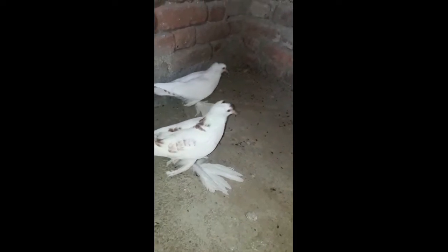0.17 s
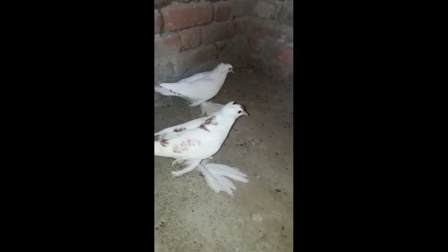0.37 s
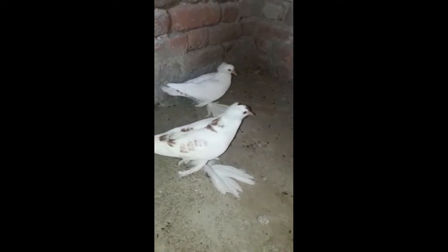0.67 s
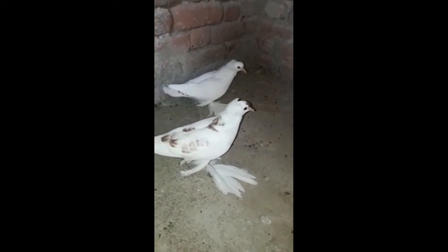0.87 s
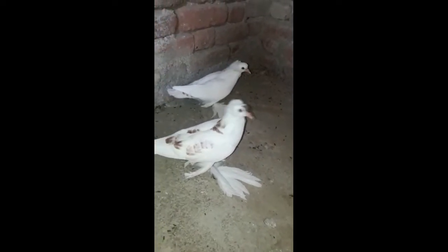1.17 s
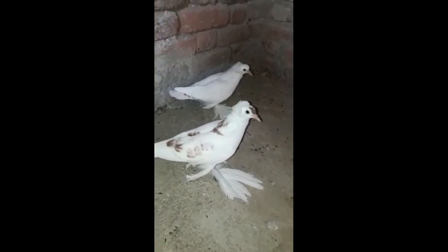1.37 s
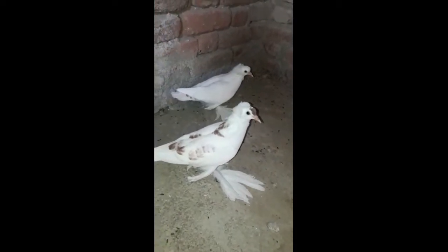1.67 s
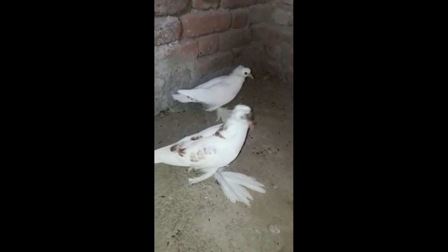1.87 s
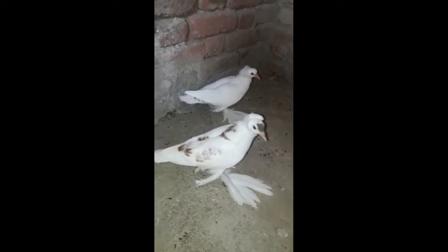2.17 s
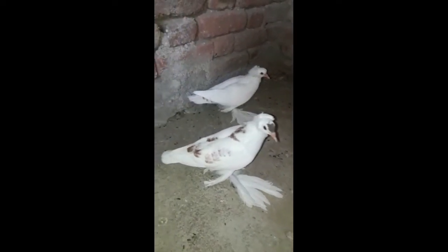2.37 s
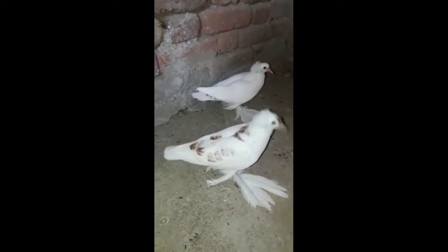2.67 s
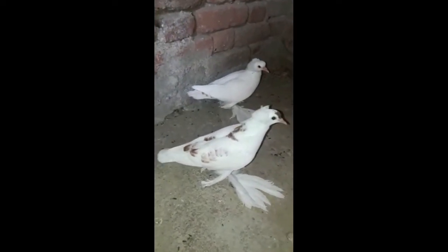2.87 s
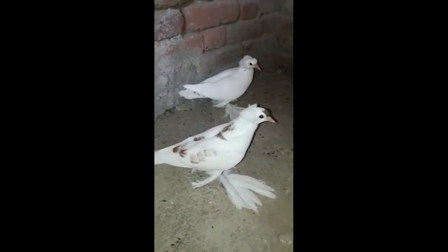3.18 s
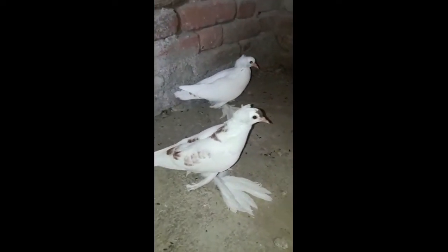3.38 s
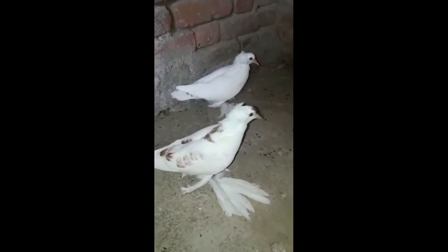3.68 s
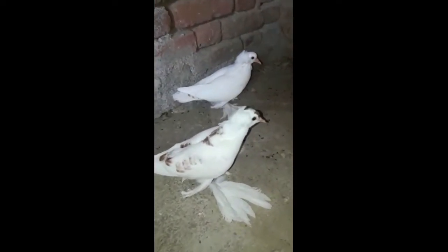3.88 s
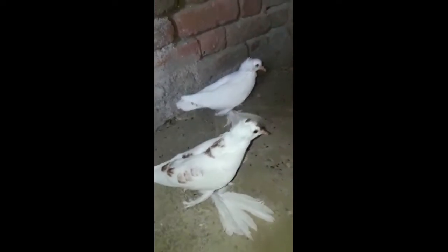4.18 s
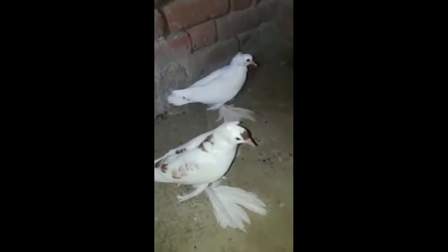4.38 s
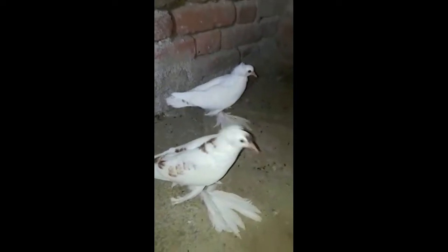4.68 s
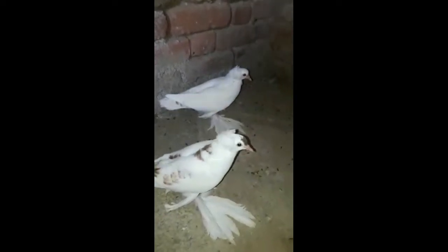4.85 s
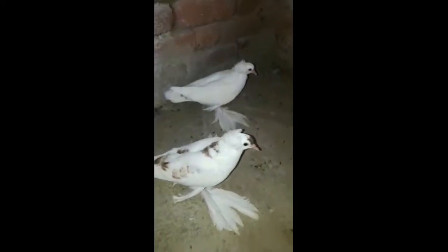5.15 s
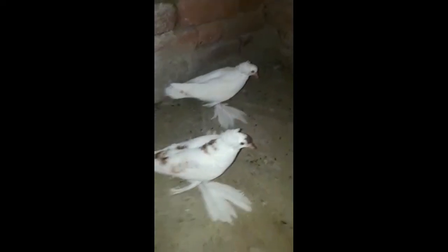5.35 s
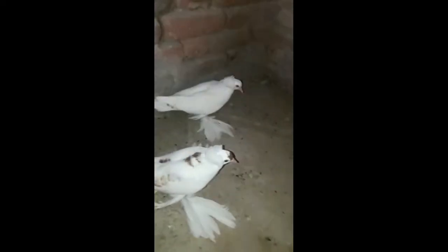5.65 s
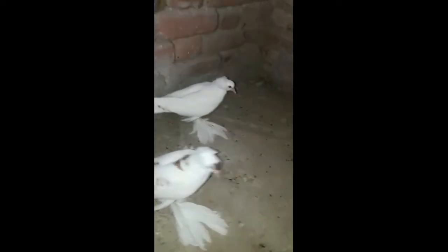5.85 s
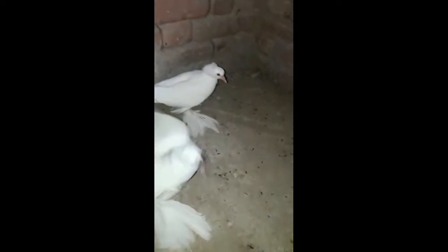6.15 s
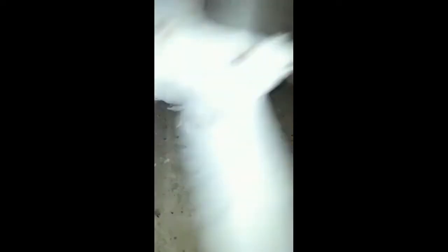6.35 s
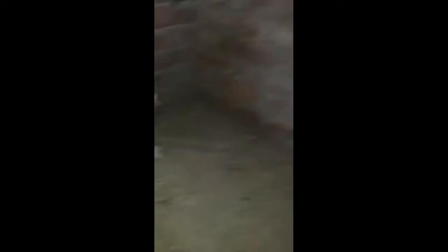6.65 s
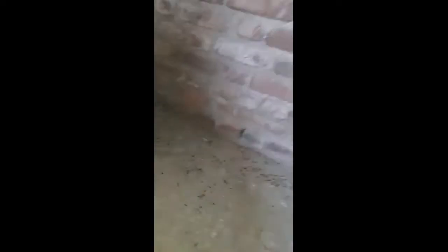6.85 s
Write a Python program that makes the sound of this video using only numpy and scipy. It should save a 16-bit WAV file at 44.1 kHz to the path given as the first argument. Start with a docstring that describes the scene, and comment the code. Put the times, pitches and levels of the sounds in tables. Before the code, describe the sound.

Two pigeons shuffle softly on a gritty floor close to the microphone, a few clicks snap, then one bursts into fluttering, whistling flight.

```python
"""Two pigeons stand on the gritty floor of a small brick room, close to a hand-held phone.
At first feet scuff (dull noise with a ring and gritty hiss) and soft wavering tones murmur and squeak,
over air, rumble and hum made of filtered noise; the hand bumps the phone, and sharp crackles click.
Then the near bird takes off: its wings unfold with a noise burst and clap with a ringing crackle. Beats
swish as noise bursts, a feather whistles a harmonic tone, and gusts push low waves onto the microphone."""
import sys
import numpy as np
from scipy import signal
from scipy.io import wavfile

SR = 44100
rng = np.random.default_rng(int(sys.argv[2]) if len(sys.argv) > 2 else 0)


def generate_wav(sig):
    """Save sig (samples, or channels by samples) to the path in sys.argv[1] as 16-bit PCM at SR."""
    pcm = np.round(np.clip(np.atleast_2d(sig).T, -1, 1) * 32767).astype(np.int16)
    wavfile.write(sys.argv[1], SR, pcm)


N = 309582  # length in samples, about 7 seconds
T = np.arange(N) / SR  # time of each sample in seconds

# The bright hiss of grit underfoot and of feathers. Each row: frequency in Hz, relative level in dB.
HISS_SPECTRUM = [(300, -42), (1500, 0.5), (2800, -4), (4200, 1), (6500, 1), (16000, -4)]
# Downstrokes of the wings. Each row: start in seconds, body level in dB, feather hiss level in dB,
# fall time in seconds.
DOWNSTROKES = [(6.24, -28, -32.5, 0.049), (6.325, -20, -31.5, 0.023), (6.465, -31.5, -37, 0.022),
               (6.593, -37, -38.5, .022), (6.718, -38, -46, 0.0085), (6.839, -32, -52, 0.019),
               (6.954, -31.5, -44, 0.031)]


def amp(db):
    """Turns decibels into gain."""
    return 10 ** (np.asarray(db) / 20)


def evened(x):
    """Scales a sound to an average (rms) level of 1."""
    return x / np.sqrt(np.mean(x ** 2) + 1e-20)


def read(points, hz):
    """Reads a table of values between its frequencies, spaced as pitch is heard (logarithmically)."""
    f, value = np.transpose(points)
    return np.interp(np.log(hz + 1), np.log(f + 1), value)


def level(curve):
    """Turns a curve of seconds and dB into gain over time."""
    return amp(np.interp(T, *np.transpose(curve)))


def add(mix, s, sound):
    """Mixes a sound in at a time in seconds."""
    part = mix[round(s * SR):][:len(sound)]
    part += sound[:len(part)]


def colour(x, spectrum, size=4096):
    """Filters a sound to the given spectrum, with no sound ahead of its cause (minimum phase)."""
    log_gain = np.log(amp(read(spectrum, abs(np.fft.fftfreq(size, 1 / SR)))))
    response = np.exp(np.conj(signal.hilbert(log_gain)))
    taps = np.fft.ifft(response).real
    return signal.oaconvolve(x, taps[:size // 2])[:len(x)]


def drift(per_s):
    """Wanders at random with unit size, through a number of new values per second."""
    knots = np.arange(N) * per_s / SR
    return evened(np.interp(knots, np.arange(N), rng.standard_normal(N)))


def noise(spectrum, grain_db=0, per_s=700):
    """Makes coloured noise of unit level that comes in clumps."""
    clumps = amp(grain_db * drift(per_s))
    return evened(colour(rng.standard_normal(N) * clumps, spectrum))


def resonate(x, hz, width):
    """Rings at one frequency, with a gain of 1 at its centre and a width in Hz."""
    sharpness = max(hz / width, .4)
    return signal.lfilter(*signal.iirpeak(min(hz, SR / 3), sharpness, SR), x)


def stroke(s, rise, fall):
    """Shapes the level of a contact: it builds up, then dies away."""
    build_up = np.clip((T - s) / rise, 0, 1)
    return build_up * np.exp(-np.clip((T - s - rise) / fall, 0, 20))


def swells(s, db, half):
    """Shapes the level of short, rounded sounds (bell curves)."""
    return sum(amp(d) * np.exp(-np.minimum(((T - at) / h) ** 2, 20)) for at, d, h in zip(s, db, half))


def crack(fall, spike=14, crisp_s=0.00062, size=2048):
    """Makes a dying crackle; the shorter the contact, the stronger its clean pressure spike."""
    burst = rng.standard_normal(size) * np.exp(-T[:size] / fall)
    burst[0] += spike * np.exp(-fall / crisp_s)
    return burst


def sized(hit, db, fall):
    """Gives a hit the energy of that level held for its fall time."""
    return amp(db) * hit * np.sqrt(fall * SR) / np.linalg.norm(hit)


def room(x):
    """Reflects sound from brick walls: sparse random echoes blur together, the upper tones dying faster."""
    # Each row: frequency in Hz, time in seconds to die away by 60 dB.
    decay_times = [(100, 0.9), (1000, 0.28), (4000, 0.21), (14000, 0.25)]
    taps = rng.choice([-1., 1.], SR // 2) * (rng.random(SR // 2) < .15)
    taps[:round(.004 * SR)] = 0  # the first echoes need 4 ms to arrive
    hz, t, z = signal.stft(taps, SR, nperseg=256)
    fading = amp(-60 * t / read(decay_times, hz)[:, None])
    tail = signal.istft(z * fading, SR, nperseg=256)[1]
    return signal.oaconvolve(x, tail / np.linalg.norm(tail))[:N]


def room_air():
    """The air of the room is a faint, slightly uneven noise."""
    # Each row: frequency in Hz, relative level in dB.
    air_spectrum = [(30, -21), (80, -3.5), (150, -2.5), (300, -1.5), (480, -2), (700, -8), (1100, -10),
                    (1800, -15), (3000, -21.5), (7000, -25.5), (16000, -24)]
    return amp(-57) * noise(air_spectrum, grain_db=2.5, per_s=23)


def rumble():
    """An uneven low noise rumbles, and settles when the hand holds still."""
    # Level over time. Each row: time in seconds, level in dB.
    rumble_levels = [(0, -64), (1, -61.5), (1.7, -71), (1.9, -55.5), (3.2, -57.5), (3.45, -70), (4.6, -69),
                     (6.2, -78)]
    # Each row: frequency in Hz, relative level in dB.
    rumble_spectrum = [(15, -12), (40, -10.5), (80, -4.5), (130, -7.5), (300, -15.5), (1000, -62)]
    return level(rumble_levels) * noise(rumble_spectrum, grain_db=0.5, per_s=13)


def hum(hum_hz=148, width_hz=42):
    """Noise passes twice through one narrow resonance, which leaves a wavering low hum."""
    # Level over time. Each row: time in seconds, level in dB.
    hum_levels = [(0, -61.5), (4.2, -63.5), (4.6, -54.5), (5, -62.5), (5.35, -57.5), (6.2, -68.5)]
    once = resonate(rng.standard_normal(N), hum_hz, width_hz)
    return level(hum_levels) * evened(resonate(once, hum_hz, width_hz))


def shuffling(rustle_db=-69):
    """Soft shuffles of noise swell and fade over a faint steady rustle."""
    # Each row: middle in seconds, level in dB, half length in seconds.
    shuffle_swells = [(2.845, -62, 0.26), (3.908, -57.5, 0.13), (4.24, -58.5, 0.073), (4.498, -55, 0.091),
                      (4.888, -67, 0.21), (5.34, -57.5, 0.077), (5.606, -51, 0.15), (6, -62.5, 0.27)]
    # Each row: frequency in Hz, relative level in dB.
    shuffle_spectrum = [(100, 1), (400, 8), (1100, 5), (1700, 8.5), (2700, 1), (4500, 1), (7000, 1),
                        (16000, -7.5)]
    loudness = amp(rustle_db) + swells(*np.transpose(shuffle_swells))
    return loudness * noise(shuffle_spectrum, grain_db=2.0, per_s=46)


def thumps(rows, rough):
    """Low pushes act on the microphone: a few cycles each, roughened by turbulent noise."""
    churn = noise([(30, -3), (300, -10.5), (700, -28), (3000, -43)])
    out = np.zeros(N)
    for s, db, hz, half in rows:
        t = T[:round(6 * half * SR)] - 3 * half  # time around the middle of the push
        turbulence = rough * np.roll(churn, -round(s * SR))[:len(t)]
        wave = turbulence - np.cos(2 * np.pi * hz * t)
        push = amp(db) * wave * np.exp(-(t / half) ** 2)
        out += np.interp(T, s + t, push, 0, 0)
    return out


def hand_bumps():
    """The hand bumps the phone, which pushes the microphone directly."""
    # Each row: middle in seconds, level in dB, frequency in Hz, half length in seconds.
    bump_rows = [(.018, -34, 109, .007), (.47, -41, 151, .011), (1.286, -41, 100, .009),
                 (1.385, -51, 115, .015), (1.65, -45, 176, .011), (1.85, -45, 80, .015),
                 (1.94, -44, 95, .014), (2.245, -49.5, 80, .015), (3.01, -50, 88, .02)]
    return thumps(bump_rows, rough=0.27)


def wavering(rows, waver, per_s, shimmer_db):
    """Short tones whose pitch and level wander; waver is a share of the pitch."""
    bent_time = np.cumsum(1 + waver * drift(per_s)) / SR
    shimmer = evened(amp(shimmer_db * drift(per_s)))
    out = np.zeros(N)
    for s, db, hz, half in rows:
        tone = np.sqrt(2) * np.sin(2 * np.pi * hz * bent_time)
        out += swells([s], [db], [half]) * tone
    return shimmer * out


def squeaks():
    """Thin, faint squeaks are high tones that waver only a little."""
    # Each row: middle in seconds, level in dB, frequency in Hz, half length in seconds.
    squeak_rows = [(.385, -71, 6400, 0.024), (.475, -71, 6300, 0.016), (.92, -76, 6450, .03),
                   (4.47, -67, 12600, .03), (5.745, -61, 2980, .018)]
    return wavering(squeak_rows, waver=0.0085, per_s=330, shimmer_db=0.5)


def murmurs():
    """Soft, throaty murmurs are low tones that waver strongly."""
    # Each row: middle in seconds, level in dB, average frequency in Hz, half length in seconds.
    murmur_rows = [(.49, -51.5, 230, 0.046), (.56, -52, 291, 0.057), (.77, -58, 230, 0.055),
                   (1.66, -50, 289.6, 0.05), (2.5, -55, 220, 0.036), (4.375, -49.5, 308, 0.016)]
    return wavering(murmur_rows, waver=0.2505, per_s=300, shimmer_db=3.0)


def scuffs(ring_db=-3, width_share=0.41, rise_share=0.18):
    """Each scuff of a foot drives a dull body with a ring of its own, and a hiss of grit."""
    # Each row: start in seconds, body level in dB, grit level in dB, fall time in seconds, ring in Hz.
    scuff_rows = [(0.186, -45, -57, 0.034, 740), (.446, -56, -81, .07, 940), (.72, -63, -64, 0.026, 1360),
                  (.974, -53, -69, 0.047, 1240), (1.225, -55.5, -60.5, 0.023, 1500),
                  (1.351, -53, -58, 0.021, 1310), (1.378, -51.5, -59, .025, 524),
                  (1.53, -50, -58, 0.022, 1370), (1.606, -57.5, -58, 0.078, 1540),
                  (1.685, -47.5, -51.5, 0.028, 1390), (1.837, -52.5, -59, .032, 1350),
                  (2.003, -45.5, -54, 0.022, 1350), (2.145, -48, -48, 0.026, 1180),
                  (2.32, -54.5, -56, 0.025, 1340), (2.399, -53, -62, 0.064, 845),
                  (2.465, -40.5, -45, 0.038, 576), (2.529, -45.5, -44.5, 0.041, 1100),
                  (2.5814, -29, -24.5, .017, 980), (2.639, -32.5, -30.5, .019, 1340),
                  (2.720, -41, -44, 0.019, 1110), (2.803, -65, -56, .05, 1400),
                  (3.025, -63, -51.5, 0.018, 1500), (3.075, -55.5, -65, 0.083, 1260),
                  (3.157, -48, -52, .021, 1120), (3.542, -55, -73, 0.04, 1060),
                  (3.991, -52, -73, 0.021, 1310), (4.317, -44, -73, 0.017, 1980),
                  (4.359, -51, -75, 0.01, 600), (5.220, -38.5, -52, 0.027, 1650)]
    # Each row: frequency in Hz, relative level in dB.
    body_spectrum = [(50, -29), (150, 5), (400, -0.5), (800, 0.5), (1600, -2.5), (2500, -7.5), (5000, -11),
                     (16000, -19)]
    body, grit = noise(body_spectrum, grain_db=3), noise(HISS_SPECTRUM, grain_db=1.0)
    out = np.zeros(N)
    for s, body_db, grit_db, fall, hz in scuff_rows:
        ring = evened(resonate(body, hz, hz * width_share))
        ringing = evened(body + amp(ring_db) * ring)
        rise = rise_share * fall  # a longer scuff also builds up longer
        out += stroke(s, rise, fall) * (amp(body_db) * ringing + amp(grit_db) * grit)
    return out


def clicks(width_share=0.87, top_share=2):
    """Small hard contacts crackle through one broad resonance each, with softened treble."""
    # Each row: start in seconds, level in dB, centre frequency in Hz, fall time in seconds.
    click_rows = [(4.156, -51.5, 1400, 0.0021), (4.3614, -42.5, 990, .0033), (5.1864, -43.5, 2400, 0.0037),
                  (5.2015, -35.5, 1490, 0.0023), (5.2068, -25.5, 6900, 0.00053), (5.209, -29, 4220, 0.0054),
                  (5.225, -30.5, 4600, 0.0037), (5.2296, -31.5, 1300, 0.0057),
                  (5.5044, -38.5, 2200, 0.0037), (5.818, -39.5, 1300, 0.0025), (5.821, -22.5, 1380, .0005),
                  (5.8227, -44, 3800, 0.0032), (6.1482, -40.5, 3200, 0.0018), (6.503, -30, 6000, .0006)]
    out = np.zeros(N)
    for s, db, hz, fall in click_rows:
        tick = resonate(crack(fall), hz, hz * width_share)
        treble_limit = min(top_share * hz, SR / 3)
        tick = signal.lfilter(*signal.butter(1, treble_limit, fs=SR), tick)
        add(out, s, sized(tick, db, fall))
    return out


def gusts():
    """Gusts from the wings hit the microphone as rough, low pushes of air."""
    # Each row: middle in seconds, level in dB, frequency in Hz, half length in seconds.
    gust_rows = [(6.336, -18, 283, 0.011), (6.384, -22, 98, 0.009), (6.522, -15.5, 169, 0.0031),
                 (6.56, -24.5, 189, 0.0055), (6.576, -21.5, 144, .007), (6.64, -27.5, 140, .0054),
                 (6.701, -23.5, 110, 0.008), (6.73, -30, 95, .009)]
    return thumps(gust_rows, rough=0.37)


def clap(snap_db=-13):
    """The wings clap at take-off: a brief double-peaked crackle that rings for a few milliseconds."""
    # The peaks of the crackle. Each row: start in seconds, level in dB, fall time in seconds.
    clap_peaks = [(6.2362, -14, 0.0017), (6.2379, -10.5, 0.002)]
    # Ring of the clapped wings. Each row: frequency in Hz, width in Hz, relative level in dB.
    ring_modes = [(1080, 210, 3.5), (1720, 180, 7), (4200, 230, 2.5), (5700, 460, -6), (7200, 590, -6)]
    out = np.zeros(N)
    for s, db, fall in clap_peaks:
        crackle = crack(fall, spike=6.1, crisp_s=0.0017)
        ring = sum(amp(mode_db) * resonate(crackle, hz, width) for hz, width, mode_db in ring_modes)
        add(out, s, sized(amp(snap_db) * crackle + ring, db, fall))
    return out


def wing_strokes(rise_s=0.0052):
    """The wings unfold just before the clap, then each downstroke swishes: low body noise and hiss."""
    # The unfolding, one row: start in seconds, level in dB, fall time in seconds.
    unfold_row = (6.201, -42.5, 0.038)
    # Each row: frequency in Hz, relative level in dB.
    wing_spectrum = [(30, -34), (100, 6), (300, 6.5), (750, 2), (1500, -4), (2200, -5.5), (4000, -12),
                     (16000, -31)]
    body, hiss = noise(wing_spectrum, grain_db=1.5), noise(HISS_SPECTRUM, grain_db=2.0)
    open_s, open_db, open_fall = unfold_row
    out = amp(open_db) * stroke(open_s, rise_s, open_fall) * (body + hiss)
    for s, body_db, hiss_db, fall in DOWNSTROKES:
        out += stroke(s, rise_s, fall) * (amp(body_db) * body + amp(hiss_db) * hiss)
    return out


def ruffle(lift_off_s=6.235, rise_s=.015, fall_s=3.4):
    """The plumage ruffles as clumpy noise from lift-off on and fades as the bird moves away."""
    # Each row: frequency in Hz, relative level in dB.
    plumage_spectrum = [(20, -27), (60, 9), (150, 3.5), (300, -4), (600, -7.5), (1500, -11.5),
                        (3000, -15.5), (6500, -23), (16000, -23)]
    loudness = amp(-33.5) * stroke(lift_off_s, rise_s, fall_s)
    return loudness * noise(plumage_spectrum, grain_db=3.0, per_s=150)


def whistle(waver=0.06, shimmer_db=4):
    """A flight feather flutters on each upstroke: a short, fuzzy harmonic tone that follows the effort."""
    # Relative level in dB of each harmonic, from the lowest up.
    harmonic_levels = [5, -0.5, -1, -13]
    first_s, beat_s, effort_fall_s = 6.276, .1222, .25
    base_db, base_hz, half_s = -35.5, 706, .014
    effort_db, effort_hz = 6, 42  # added at full effort
    # upstrokes come at a steady beat; the first ones are harder, so louder and higher
    since = beat_s * np.arange(len(DOWNSTROKES))
    s, effort = first_s + since, np.exp(-since / effort_fall_s)
    pitch = np.interp(T, s, base_hz + effort_hz * effort) * (1 + waver * drift(900))
    turns = np.cumsum(pitch) / SR
    tone = np.zeros(N)
    for k, part_db in enumerate(harmonic_levels):
        tone += amp(part_db + shimmer_db * drift(300)) * np.sin(2 * np.pi * (k + 1) * turns)
    loudness = swells(s, base_db + effort_db * effort, np.full(len(s), half_s))
    return loudness * evened(tone)


def scene():
    """Foot and voice sounds are farther off, so wetter, than clicks and wings; thumps get no echo."""
    small = scuffs() + murmurs() + squeaks()
    ticks, slap = clicks(), clap()
    flight = wing_strokes() + ruffle() + whistle()
    echo = room(amp(-6.5) * small + amp(-8.5) * ticks + amp(-20) * slap + amp(-19) * flight)
    direct = amp(-0.5) * small + ticks + slap + flight
    background = room_air() + rumble() + shuffling() + hum()
    return (direct + echo + hand_bumps() + gusts() + background)[None]


def record(dry):
    """The phone's microphone colours the sound, then the highest treble is cut off."""
    # Each row: frequency in Hz, gain in dB.
    mic_colour = [(10, -6), (35, -0.5), (5800, 1), (6300, 3), (6850, 3), (7300, -3), (7800, -11.5),
                  (9000, -10), (11500, -4.5), (15500, -5)]
    edge = signal.firwin(511, 15750, window=("kaiser", 9), fs=SR)  # cutoff in Hz
    return signal.oaconvolve(colour(dry[0], mic_colour), edge, "same")[None]


dry = scene()
out = record(dry)
generate_wav(out)
```